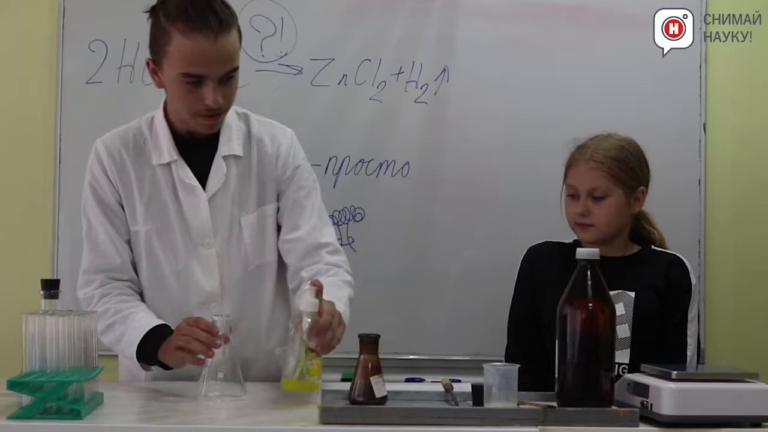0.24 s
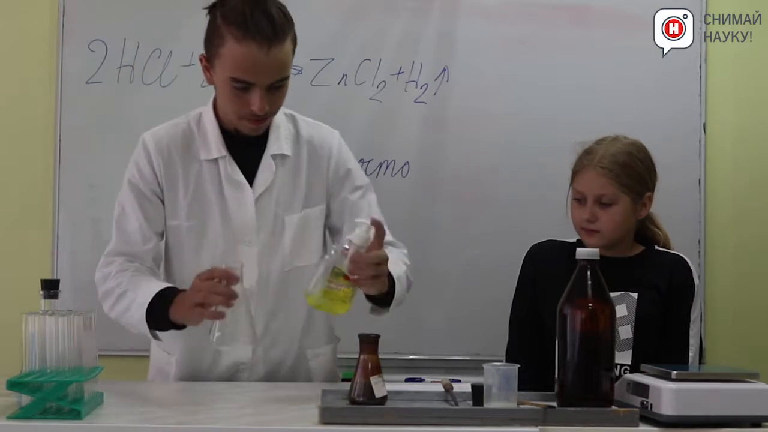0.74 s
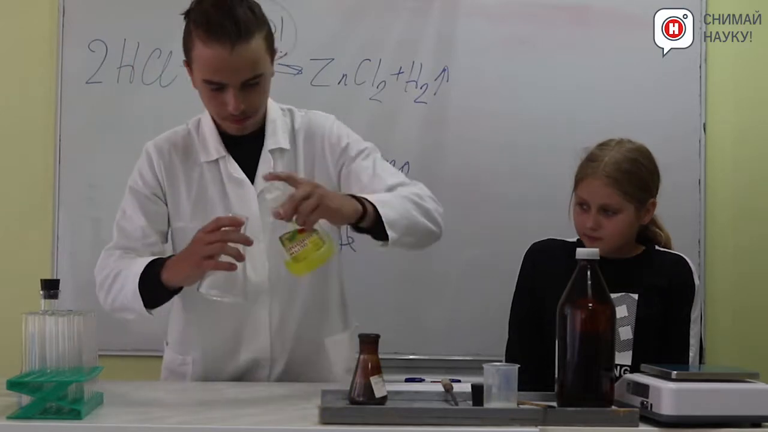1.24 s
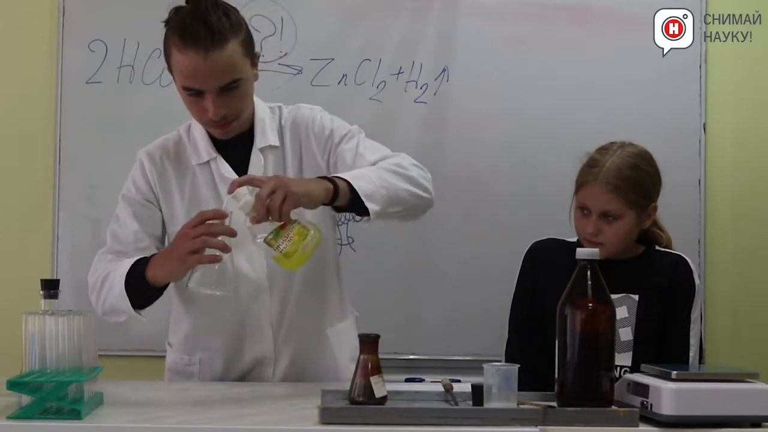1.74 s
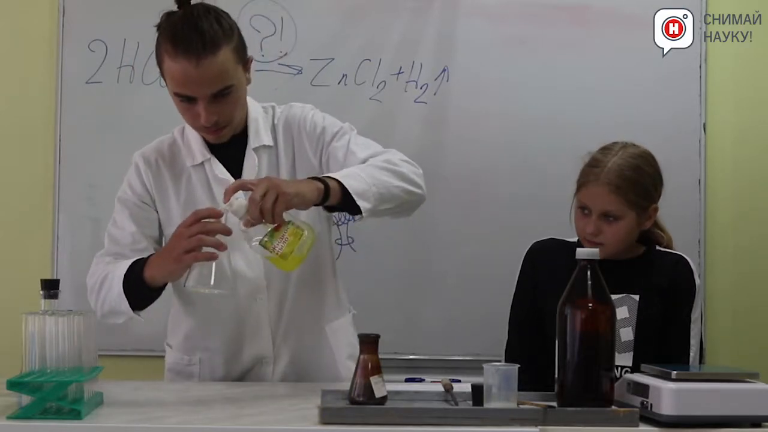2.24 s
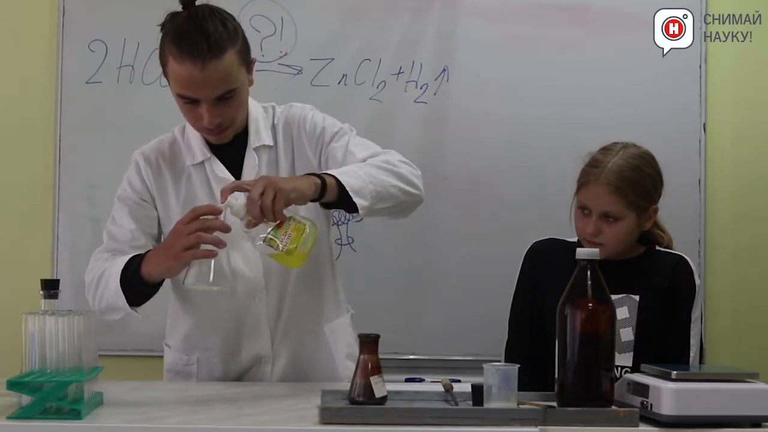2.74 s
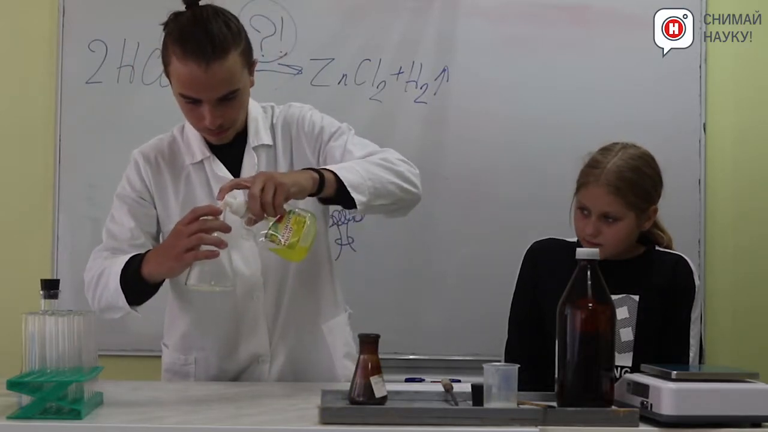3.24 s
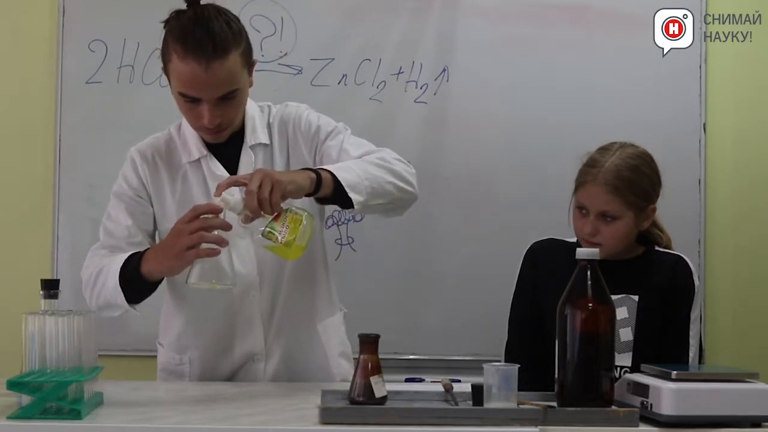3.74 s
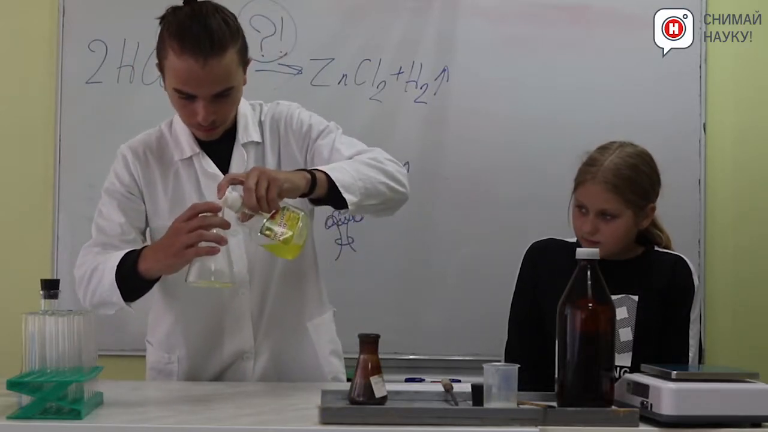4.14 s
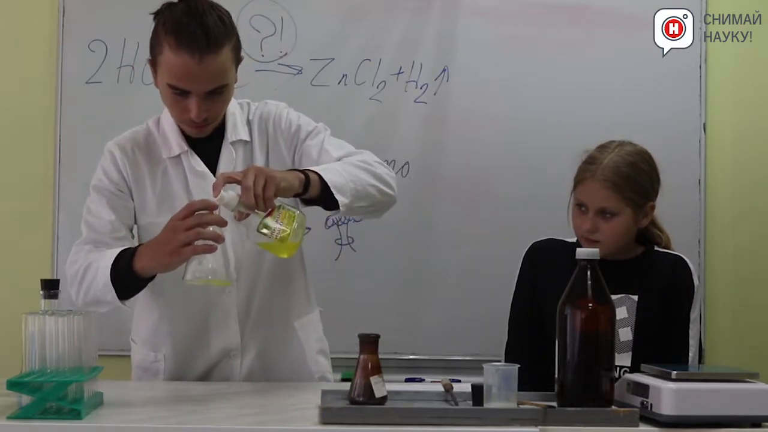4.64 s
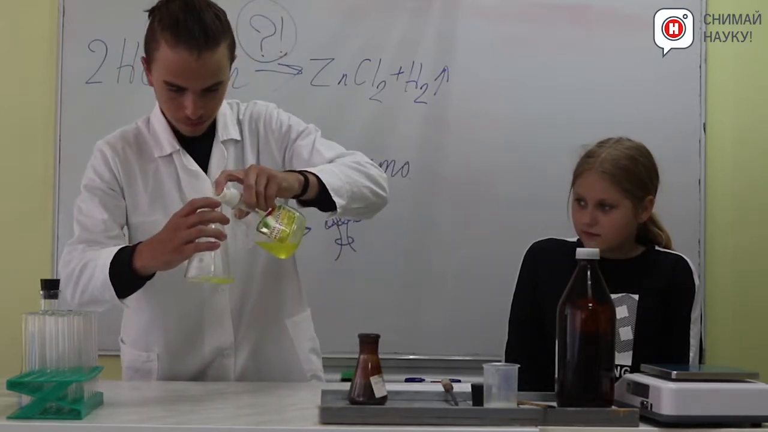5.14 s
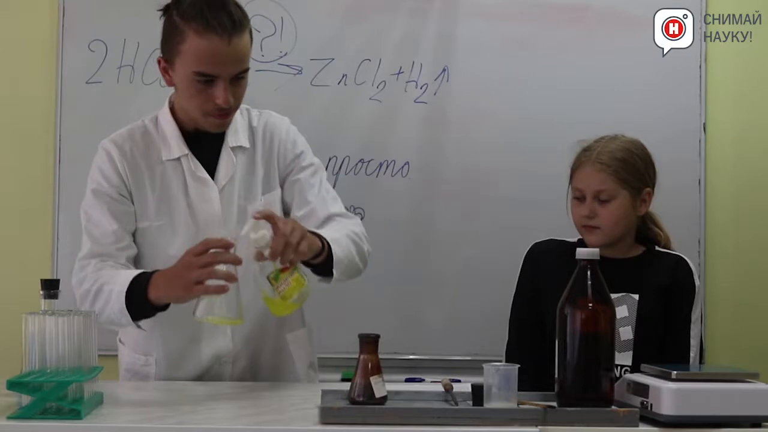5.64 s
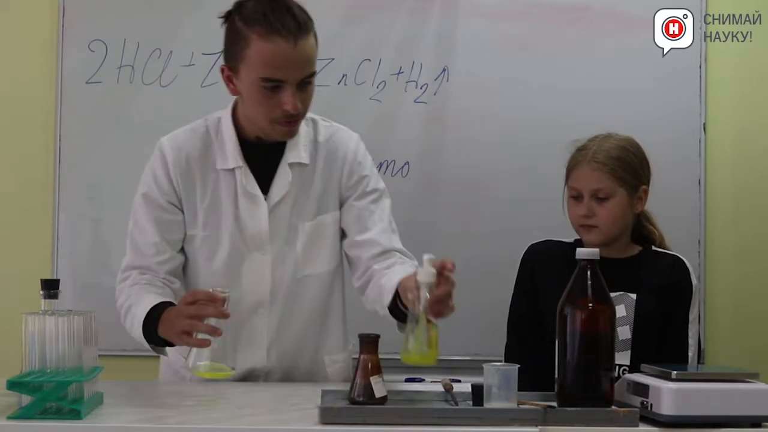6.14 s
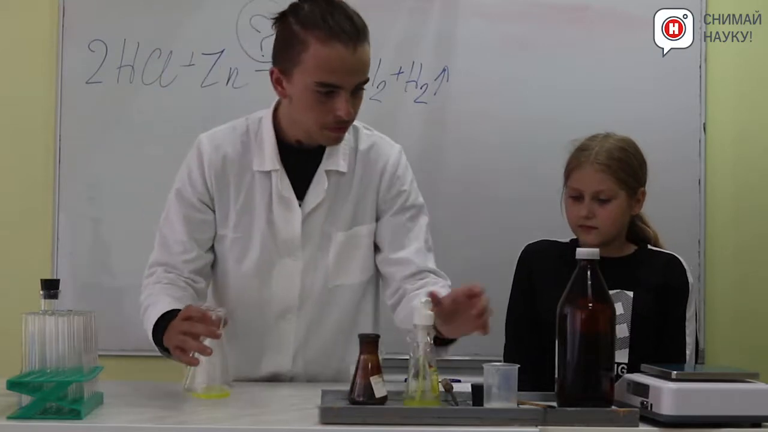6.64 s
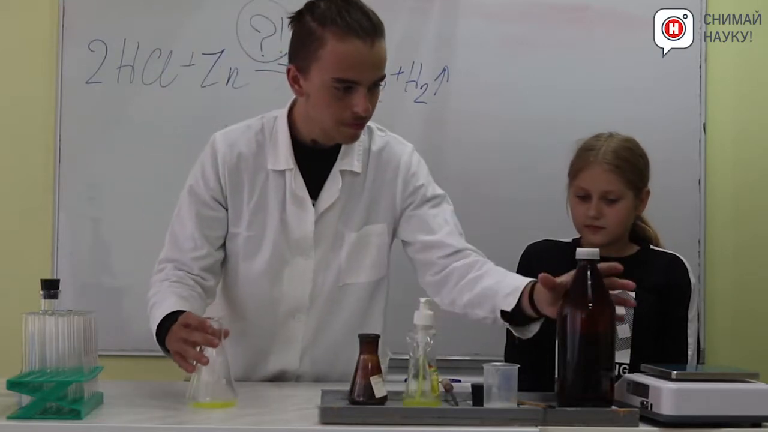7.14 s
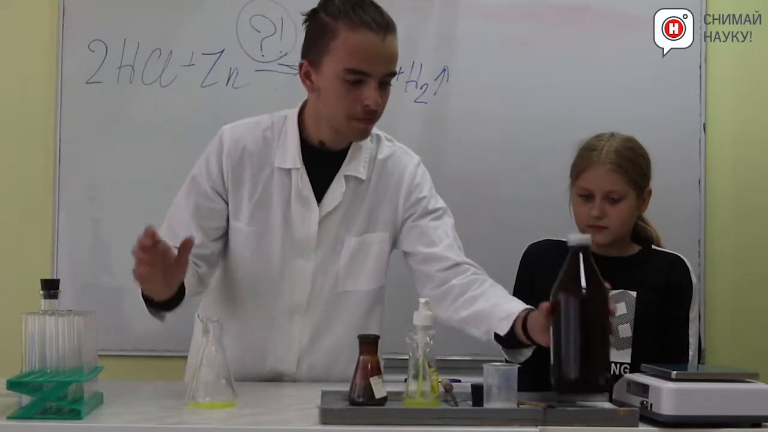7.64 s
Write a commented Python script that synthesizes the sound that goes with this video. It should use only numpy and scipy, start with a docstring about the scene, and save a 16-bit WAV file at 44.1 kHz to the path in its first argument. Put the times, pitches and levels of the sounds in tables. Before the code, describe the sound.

A pump dispenser clicks five times over a glass flask, knocking against it, then bottle and flask are set down on a table.

```python
"""A soap dispenser is pumped over a glass flask in a bare classroom, after being dragged off a table.
The pump head snaps down and back, the nozzle spits, and the spout knocks the flask neck, which rings.
Bottle and flask are set down, the table frame booms, and a heavy bottle leaves its tray. Each impact
is an impulse filtered by the resonances of the struck body, then reflected by the room.
Something plastic ticks close by; a faint mains hum and hiss lie underneath."""
import sys
import numpy as np
from scipy import signal
from scipy.io import wavfile
from scipy.ndimage import uniform_filter1d

SR = 44100
rng = np.random.default_rng(int(sys.argv[2]) if len(sys.argv) > 2 else 0)


def bounce(signal):
    """Save signal as a 16-bit WAV file at the path given by the first command-line argument."""
    frames = np.transpose(np.atleast_2d(signal))
    limited = np.clip(frames, -1, 1)
    pcm = np.round(limited * 32767).astype(np.int16)
    wavfile.write(sys.argv[1], SR, pcm)


N = 347508

# pump head snapping down and springing back: (time [s], peak level [dB])
PRESSES = [(2.1788, -3), (2.9798, -2.5), (3.5175, -2.5), (3.9838, -3), (5.075, -3.5)]
RELEASES = [(2.4255, -5.5), (3.2342, -5.5), (3.8373, -4), (4.8545, -5.5), (5.3, -10.5)]
# soap spitting from the nozzle: (time [s], peak level [dB], length [s])
SQUIRTS = [(2.104, -42, 0.013), (2.3247, -30.5, 0.0084), (3.1784, -34, 0.0025), (3.715, -30.5, 0.025),
           (4.2063, -32, 0.018), (5.243, -29, 0.02)]
# bottle knocking the flask: (time [s], peak level [dB], extra bass [dB], extra treble [dB])
KNOCKS = [(1.219, -40, 9, -8), (2.0065, -25, 3.5, 9.5), (2.7385, -13.5, -3, 9.5), (3.461, -14, -7, 9),
          (3.9625, -11, -9, 5), (4.4554, -11.5, -10.5, 8), (4.606, -30, -2, 2), (5.049, -11.5, -8.5, 9),
          (5.583, -39.5, -16, 7), (5.945, -38.5, -8.5, 6)]
# light touches on the flask neck: (time [s], peak level [dB], extra bass [dB], rim ping level [dB])
TOUCHES = [(0.827, -38, -9, -61), (4.231, -27, 16.5, -39.5), (4.722, -24, 9.5, -47),
           (5.255, -24.5, 15, -37), (5.626, -30.5, 7, -49), (7.205, -34, 5, -52)]
# other impacts: (time [s], peak level [dB], extra bass [dB])
BOTTLE_DOWNS = [(6.3905, -21.5, 4), (6.4134, -14.5, 1)]
FLASK_DOWNS = [(6.9866, -15, 2.5), (7.19, -39, -6), (7.203, -24.5, 1)]  # set down, then rocking flat
TRAY_LIFTS = [(7.62, -36, -4), (7.6486, -25.5, 1)]
NEAR_TICKS = [(.5188, -24, 10), (.5453, -26.5, 0), (.5986, -21.5, 2.5), (.606, -29.5, -5),
              (.6196, -27.5, 1)]
# colour of each body, its peaks being short resonances: (frequency [Hz], relative level [dB])
PRESS_COLOUR = [(150, -29), (320, -15), (750, -7), (1200, -7.5), (1430, -3), (1620, 2), (1940, -10),
                (2240, -0.5), (2750, -11), (3050, -5.5), (3600, -2), (4100, -11), (6100, -15), (7400, -9),
                (8200, -28), (11000, -30.5), (16000, -56)]
RELEASE_COLOUR = [(150, -122), (400, -26), (570, -3), (1000, -15), (1600, 1), (1900, -3.5), (2220, 4.5),
                  (2550, 0.5), (3200, -4), (3700, -5.5), (4400, -10.5), (5500, -16), (7000, -18.5),
                  (8000, -27.5), (16000, -51)]
NOZZLE_COLOUR = [(150, -2), (700, 11.5), (1500, 9.5), (3500, 6.5), (5200, -4.5), (6500, -2), (8500, 1.5),
                 (12500, -12), (16000, -16)]
BOTTLE_COLOUR = [(150, -41.5), (310, -9), (480, -4), (655, 8.5), (850, 0), (1200, -7), (1600, -14),
                 (2400, -13.5), (3500, -12.5), (4400, -22), (7500, -28.5), (9500, -30), (13000, -42.5),
                 (15000, -53), (16000, -26)]
NECK_COLOUR = [(150, -66), (400, -13.5), (650, -6), (1000, -12), (2000, -5), (3300, -6), (5000, -27.5),
               (7300, -25.5), (10000, -29.5), (13000, -31), (16000, -48)]
TABLE_COLOUR = [(53, -50), (90, -23), (130, 0), (162, -16), (188, -8.5), (330, -5.5), (896, -3.5),
                (1070, -14), (1210, -11), (8350, -36.5), (16000, -44)]
FLASK_BASE_COLOUR = [(53, -61), (90, -41), (165, -10.5), (284, -9.5), (499, -3.5), (620, -9), (1090, -11),
                     (3290, -35.5), (5650, -42), (6300, -41), (16000, -58)]
TRAY_COLOUR = [(29, -40), (50, -8), (184, 2), (371, -11.5), (450, -20.5), (1870, -20), (2110, -22),
               (2440, -21), (5950, -24), (8340, -14), (16000, -35)]
PLASTIC_COLOUR = [(150, -43), (250, -26), (430, -2.5), (680, -12.5), (930, 9), (1400, -15), (2200, -12.5),
                  (2500, -25), (2850, -17.5), (4000, -25), (6900, -35.5), (7500, -19.5), (8000, -22),
                  (8500, -20), (9200, -26.5), (16000, -57)]
# thin glass set ringing: (time [s], level [dB])
CLINKS = [(.165, -50), (.34, -58)]  # as the bottle slides off
SPOUT_TAPS = [(2.006, -42)]
WALL_RINGS = [(5.63, -63), (6.988, -46), (7.204, -66)]
FAINT_RINGS = [(4.548, -57)]
# modes of the glass, table frame and table top: (frequency [Hz], relative level [dB], t60 [s])
CLINK_MODES = [(3742, -6, .3), (6756, 0, .22), (9940, -4, .09), (10850, -6, .25), (12375, -3, .12)]
TAP_MODES = [(4000, -16, .15), (4700, -5, 0.045), (9770, -2, 0.09), (10390, 5.5, 0.05), (12260, -12, .08)]
WALL_MODES = [(3870, -8, .05), (6095, 0, .3), (6190, -4, .15), (9600, -16, .1), (11900, -13, .1)]
FAINT_MODES = [(6240, 0, .35)]
RIM_MODES = [(3385, 0, .4)]
FRAME_MODES = [(57.6, -4, 0.91), (101, 9, 0.21), (136, 15.5, 0.15)]
TOP_MODES = [(180, -38, 0.045), (317, 3.5, 0.17), (409, 10.5, 0.085), (530, 16, 0.028), (672, 5.5, 0.11),
             (840, 8, 0.014)]
# booms of the table frame: (time [s], gain of lowest mode [dB], gain of upper modes [dB])
THUMPS = [(6.414, -40, -35), (6.99, -51, -48), (7.202, -57, -62), (7.649, -44, -43)]
# envelope of the sliding bottle: (time [s], rumble level [dB], scrape relative to rumble [dB])
DRAG_ENVELOPE = [(0.0, -41, -17), (0.098, -49.5, -18), (0.194, -38, -21), (0.324, -44.5, -27),
                 (0.332, -48.5, -10), (0.354, -38.5, -18), (0.47, -52, -21), (0.478, -56, -25),
                 (0.492, -57, -5), (0.5, -46, -20)]
# wall and table reflections: (delay [s], level [dB])
ECHOES = [(.0045, -12), (.0066, -5), (.0095, -15), (.0152, -15), (.0185, -14), (.023, -13)]
# reverberation time of the classroom: (frequency [Hz], t60 [s])
ROOM_T60 = [(100, 0.22), (300, 0.74), (800, 0.53), (2000, 0.43), (5500, 0.5), (12000, 0.33)]
# mains hum lines: (frequency [Hz], median rms level [dB])
HUM_LINES = [(150.7, -68.5), (247.6, -70), (301.5, -69.5), (355.3, -72)]
# hiss spectrum: (frequency [Hz], relative density [dB])
HISS_COLOUR = [(20, -22), (40, -11.5), (65, -16), (100, -3), (150, -4.5), (300, -0.5), (500, -8),
               (1000, -12), (2200, -12.5), (4000, -20.5), (8000, -21), (13000, -25), (16000, -30.5)]

# pump tone: (extra bass [dB], extra treble at full scale [dB], treble per level [dB/dB])
PRESS_RULE, RELEASE_RULE = (-9, 3, 5.1), (2.7, 17.1, 2.73)
# impact tone: (extra treble at MIDDLING_DB [dB], treble per level [dB/dB], rattle length [s])
TOUCH_RULE, TICK_RULE = (5.3, -.36, .0048), (1.3, -.3, .0027)
TABLE_RULE, FLASK_RULE, TRAY_RULE = (-.45, .53, .018), (.3, .1, .028), (3.5, 2, .023)
MIDDLING_DB = -20


def pump_head():
    """Impact of plastic on plastic: the head excites different resonances going down and coming back."""
    down = snaps(PRESSES, PRESS_COLOUR, PRESS_RULE, rebound=(.0005, -21), knee_hz=3740, lag=(1787, 1500))
    up = snaps(RELEASES, RELEASE_COLOUR, RELEASE_RULE,
               rebound=(.0009, -7.5), knee_hz=1970, lag=(2680, 800))
    return down + up


def snaps(rows, colour, rule, rebound, knee_hz, lag):
    """Hard contact: an impulse and its rebound (delay [s], level [dB]), brighter when harder."""
    out = np.zeros(N)
    bass_db, treble_db, slope = rule
    rebound_s, rebound_db = rebound
    for s, db in rows:
        body = lagged(body_response(colour, bass_db, treble_db + slope * db, knee_hz), *lag)
        sound = body.copy()
        add(sound, rebound_s, gain_of(rebound_db) * body)
        add(out, s, gain_of(db) * sound / abs(sound).max())
    return out


def nozzle_squirts(bass_db=5, treble_db=-4):
    """Source and filter: spitting soap is a brief noise burst coloured by the nozzle."""
    rows = [(s, db, bass_db, treble_db, length_s) for s, db, length_s in SQUIRTS]
    return impacts(rows, NOZZLE_COLOUR, rattle_db=-14, lag=(700, 360))


def flask_knocks(rattle_s=.011):
    """Impact excitation: knocks and light touches drive damped resonances of bottle and flask neck."""
    rows = [(*row, rattle_s) for row in KNOCKS]
    knocks = impacts(rows, BOTTLE_COLOUR, rattle_db=-17.5, lag=(725, 133), grit_db=-9)
    return knocks + impacts(struck(TOUCHES, TOUCH_RULE), NECK_COLOUR, rattle_db=-24.5, lag=(670, 210))


def glass_rings(flutter_db=2.5, damped_after_s=.05):
    """Free vibration: glass walls ring, fluttering in the grip; the rim pings until a hand damps it."""
    out, t = np.zeros(N), np.arange(SR // 2) / SR
    for rows, modes in ((CLINKS, CLINK_MODES), (SPOUT_TAPS, TAP_MODES),
                        (WALL_RINGS, WALL_MODES), (FAINT_RINGS, FAINT_MODES)):
        for s, db in rows:
            add(out, s, ring(modes, db))
    out *= gain_of(flutter_db * slow_noise(N, 300))
    damping = np.exp(-np.maximum(t - damped_after_s, 0) / .006)
    for s, _, _, db in TOUCHES:
        add(out, s, ring(RIM_MODES, db) * damping)
    return out


def bench_impacts():
    """Impact excitation: bottle and flask meet the table, and a heavy bottle leaves its tray."""
    bottle = impacts(struck(BOTTLE_DOWNS, TABLE_RULE), TABLE_COLOUR, rattle_db=-14.5, lag=(525, 240))
    flask = impacts(struck(FLASK_DOWNS, FLASK_RULE), FLASK_BASE_COLOUR, rattle_db=-18, lag=(480, 235))
    tray = impacts(struck(TRAY_LIFTS, TRAY_RULE), TRAY_COLOUR, rattle_db=-23, lag=(206, 150))
    return bottle + flask + tray


def frame_thumps(rise_s=.034):
    """Structural resonance: low modes of the table frame swell over a few cycles and decay."""
    out, t = np.zeros(N), np.arange(SR // 2) / SR
    swell = 1 - np.exp(-t / rise_s)
    for s, lowest_db, upper_db in THUMPS:
        add(out, s, ring(FRAME_MODES, np.c_[[lowest_db, upper_db, upper_db]]) * swell)
    return out


def bottle_drag(slips_per_s=600):
    """Stick-slip friction: uneven slips of the bottle shake the table top under a finer scrape."""
    s, rumble_db, scrape_db = np.transpose(DRAG_ENVELOPE)
    t = np.arange(round(s[-1] * SR)) / SR
    size_db = 2.8 * rng.exponential(1, len(t))
    slipping = rng.random(len(t)) < slips_per_s / SR
    noise = rng.standard_normal(len(t))
    slips = gain_of(size_db) * slipping * np.sign(noise)
    rumble = signal.fftconvolve(slips, ring(TOP_MODES))[:len(t)]
    # a small top radiates no deep bass
    rumble = unit_rms(signal.lfilter(*signal.butter(3, 170, "high", fs=SR), rumble))
    scrape = unit_rms(signal.lfilter(*signal.butter(1, [1200, 3500], "band", fs=SR), noise + .17 * slips))
    scrape *= gain_of(np.interp(t, s, scrape_db))
    slide = gain_of(np.interp(t, s, rumble_db)) * (rumble + scrape)
    return np.pad(slide, (0, N - len(t)))


def plastic_ticks():
    """Impact excitation: tiny blows drive the short resonances of something plastic."""
    return impacts(struck(NEAR_TICKS, TICK_RULE), PLASTIC_COLOUR, rattle_db=-15.5, lag=(890, 700))


def classroom(direct, reverb_feed, turn_hz=.9):
    """Reverberation: direct sound, early echoes, then three tails whose bands decay at their own rates."""
    early = np.zeros(SR // 20)
    early[0] = 1
    for s, db in ECHOES:
        add(early, s, [gain_of(db)])
    taps, slots = np.zeros((3, SR)), np.arange(120, SR - 16, 16)
    arrivals = slots + rng.integers(0, 16, (3, len(slots)))  # one reflection in each slot
    np.put_along_axis(taps, arrivals, rng.choice([-1., 1.], arrivals.shape), 1)
    hz, t, spectra = signal.stft(taps, SR, nperseg=256)
    decay = gain_of(-60 * t / spectrum_at(ROOM_T60, hz)[:, None])
    tails = signal.istft(spectra * decay, SR, nperseg=256)[1][:, :SR]
    tails *= 1 - np.exp(-np.arange(SR) / SR / .008)  # the diffuse field needs a moment to build
    tails /= np.linalg.norm(tails[0])
    turn = 2 * np.pi * (np.arange(N) * turn_hz / SR + np.arange(3)[:, None] / 3)
    feeds = reverb_feed * np.cos(turn) * np.sqrt(2 / 3)  # the tails are fed in turn
    late = signal.fftconvolve(feeds, tails, axes=1).sum(0)
    return signal.oaconvolve(direct, early)[:N] + late[:N]


def hiss(level_db=-55.5):
    """Filtered Gaussian noise: a steady hiss with faint patches in time and frequency."""
    frames, hz = N // 512 + 5, np.fft.rfftfreq(2048, 1 / SR)
    real, imag, patches = rng.standard_normal((frames, 1025, 3)).T
    patches_db = unit_rms(uniform_filter1d(uniform_filter1d(patches, 20, 0), 8, 1))
    spectra = (real + 1j * imag) * gain_of(spectrum_at(HISS_COLOUR, hz)[:, None] + patches_db)
    return gain_of(level_db) * unit_rms(signal.istft(spectra, nperseg=2048, noverlap=1536)[1][:N])


def mains_hum(waver_db=4.55, waver_rad=.23):
    """Random modulation: each hum line wavers slowly in amplitude and phase."""
    out, t = np.zeros(N), np.arange(N) / SR
    for hz, db in HUM_LINES:
        swell, drift = slow_noise((2, N), 3000)
        out += np.sqrt(2) * gain_of(db + waver_db * swell) * np.sin(2 * np.pi * hz * t + waver_rad * drift)
    return out


def impacts(rows, colour, rattle_db, lag, grit_db=-17):
    """Convolution: an impulse, grit and a short rattle of contact noise pass through a body's response."""
    out, t = np.zeros(N), np.arange(SR // 8) / SR
    grit = gain_of(grit_db) * np.exp(-t / .0006)
    for s, db, bass_db, treble_db, rattle_s in rows:
        rattle = gain_of(rattle_db) * np.exp(-(t / rattle_s) ** 2)
        force = rng.standard_normal(len(t)) * (grit + rattle)
        force[0] = 1
        sound = lagged(signal.fftconvolve(force, body_response(colour, bass_db, treble_db)), *lag)
        add(out, s, gain_of(db) * sound / abs(sound).max())
    return out


def struck(rows, rule):
    """Force sets brightness: gives each blow the treble for its level and the rattle of its body."""
    treble_db, slope, rattle_s = rule
    return [(s, db, bass_db, treble_db + slope * (db - MIDDLING_DB), rattle_s)
            for s, db, bass_db, *_ in rows]


def body_response(colour, bass_db, treble_db, knee_hz=4200):
    """Minimum-phase impulse response of a body, its bass and treble shifted by where the blow lands."""
    hz = np.fft.rfftfreq(8192, 1 / SR)
    tilt = [(25, bass_db - 59), (90, bass_db), (800, bass_db),  # small bodies radiate no deep bass
            (1300, 0), (knee_hz, 0), (1.85 * knee_hz, treble_db)]
    db = spectrum_at(colour, hz) + spectrum_at(tilt, hz)
    mirrored_db = np.r_[db, db[-2:0:-1]]
    log_gain = np.log(gain_of(np.maximum(mirrored_db, -90)))
    return np.fft.ifft(np.exp(np.conj(signal.hilbert(log_gain)))).real[:4096]


def lagged(x, centre_hz, width_hz):
    """Group delay: an all-pass makes one band build over a few cycles instead of starting at once."""
    radius = np.exp(-np.pi * width_hz / SR)
    poles = np.array([1, -2 * radius * np.cos(2 * np.pi * centre_hz / SR), radius ** 2])
    return signal.lfilter(poles[::-1], poles, x)


def ring(modes, extra_db=0):
    """Modal superposition: one exponentially decaying sine for each mode."""
    hz, db, t60 = np.transpose(modes)[:, :, None]
    t = np.arange(SR // 2) / SR
    return (gain_of(db + extra_db - 60 * t / t60) * np.sin(2 * np.pi * hz * t)).sum(0)


def slow_noise(shape, samples):
    """Low-pass noise of unit rms, smoothed by two moving averages."""
    return unit_rms(uniform_filter1d(uniform_filter1d(rng.standard_normal(shape), samples), samples))


def spectrum_at(points, hz):
    """Interpolation on a log-frequency axis."""
    known_hz, value = np.transpose(points)
    return np.interp(np.log(hz + 1), np.log(known_hz + 1), value)


def gain_of(db):
    """Amplitude ratio of a level in decibels."""
    return 10 ** (np.asarray(db) / 20)


def unit_rms(x):
    """Normalisation to rms 1."""
    return x / np.sqrt(np.mean(x ** 2) + 1e-20)


def add(mix, s, sound):
    """Superposition of a sound on the mix at time s."""
    part = mix[round(s * SR):][:len(sound)]
    part += sound[:len(part)]


def scene():
    """Superposition: dispenser, flask and bench sound in the room; close ticks, hiss and hum stay dry."""
    pump = pump_head()
    at_flask = flask_knocks() + nozzle_squirts()
    bench = bench_impacts() + frame_thumps()
    rings, slide = glass_rings(), bottle_drag()
    direct = pump + at_flask + bench + rings + slide
    # broad bodies feed the room more than the small pump head
    reverb_feed = (gain_of(-2.5) * pump + at_flask + gain_of(-1) * bench
                   + gain_of(-13.5) * rings + gain_of(-4.5) * slide)
    return (classroom(direct, reverb_feed) + plastic_ticks() + hiss() + mains_hum())[None]


def record(dry):
    """Band limiting: a linear-phase low-pass removes the highest treble."""
    low_pass = signal.firwin(511, 15750, window=("kaiser", 9), fs=SR)
    return signal.oaconvolve(dry, low_pass[None], "same")


dry = scene()
out = record(dry)
bounce(out)
```